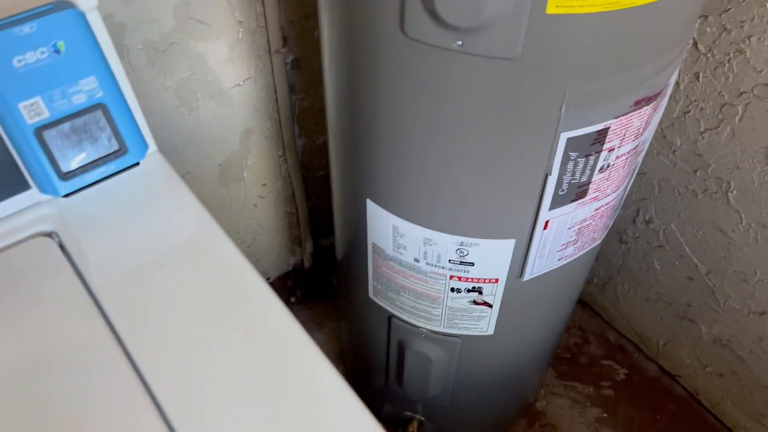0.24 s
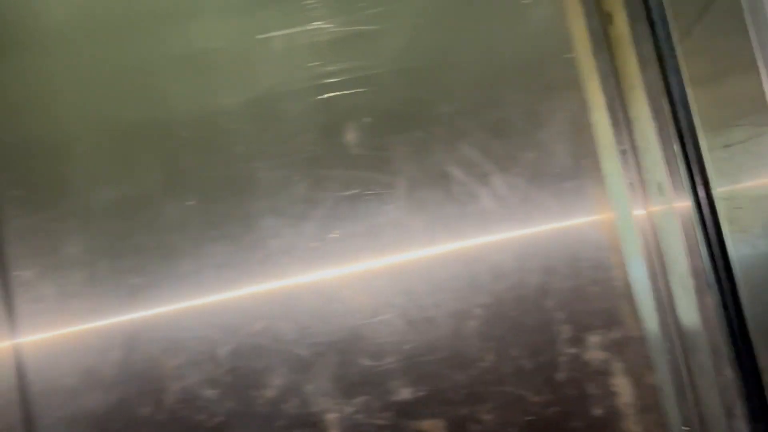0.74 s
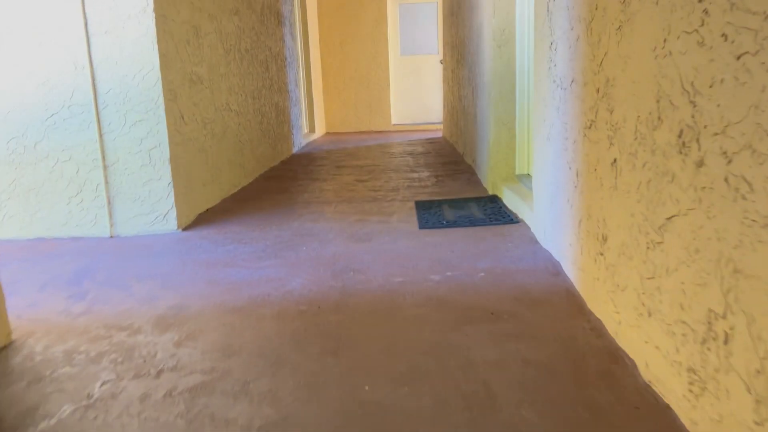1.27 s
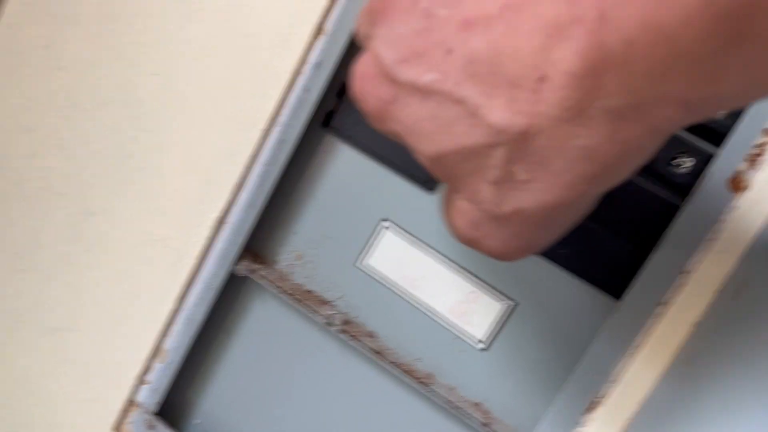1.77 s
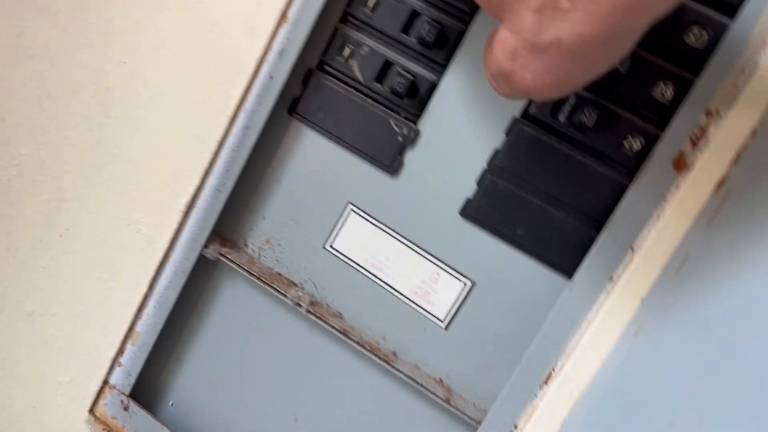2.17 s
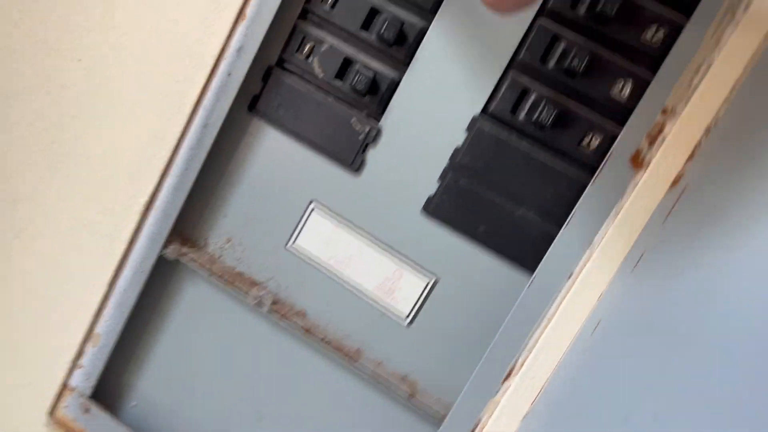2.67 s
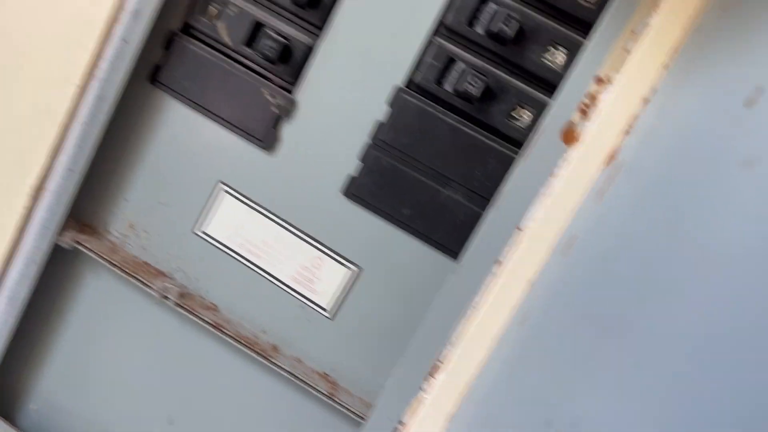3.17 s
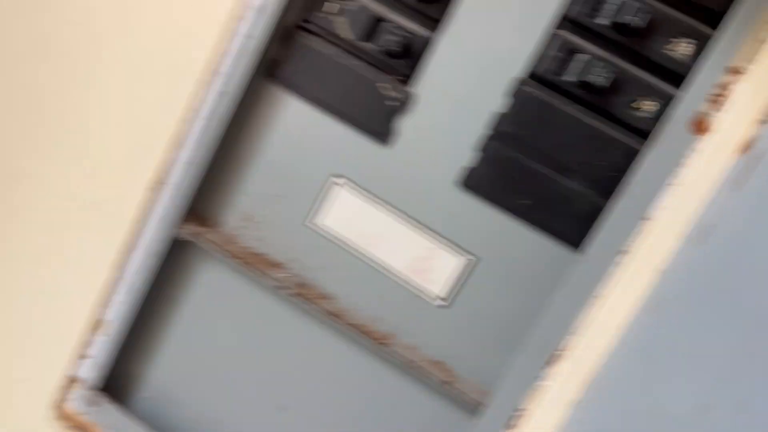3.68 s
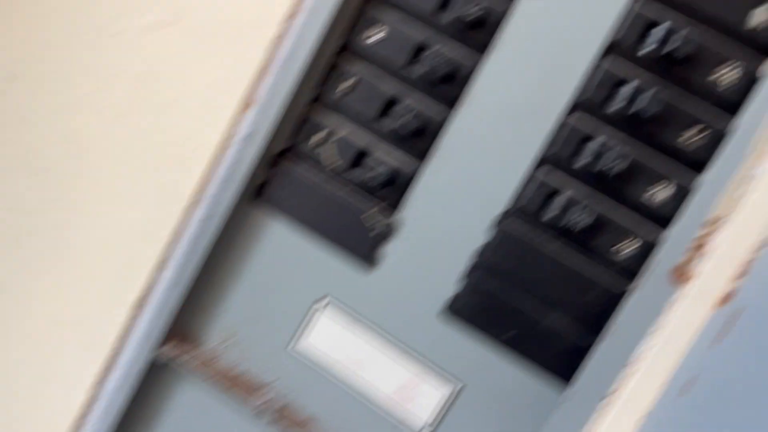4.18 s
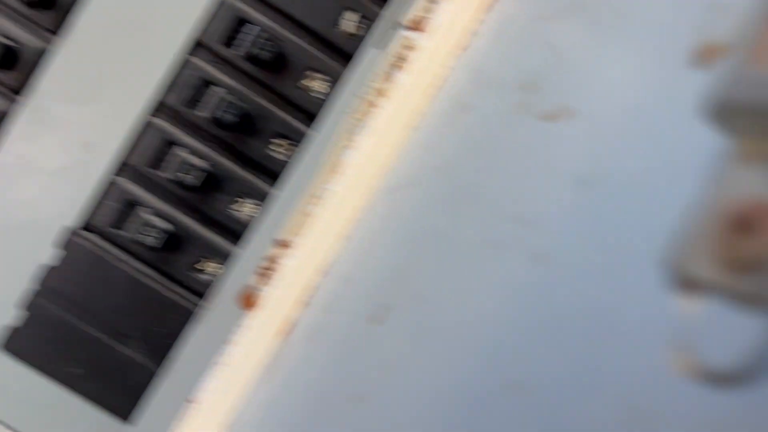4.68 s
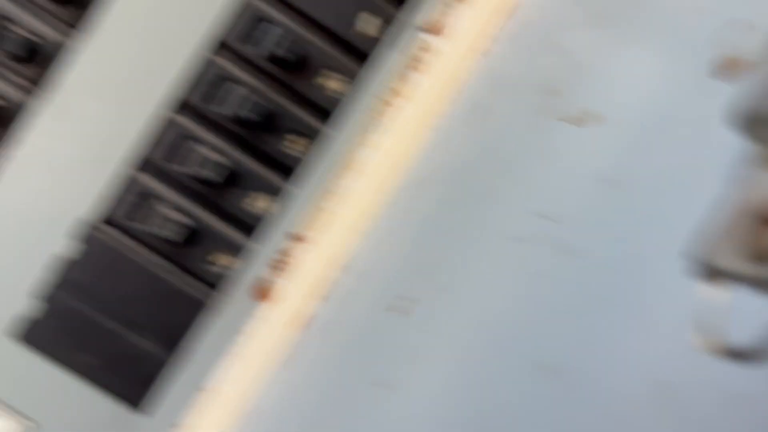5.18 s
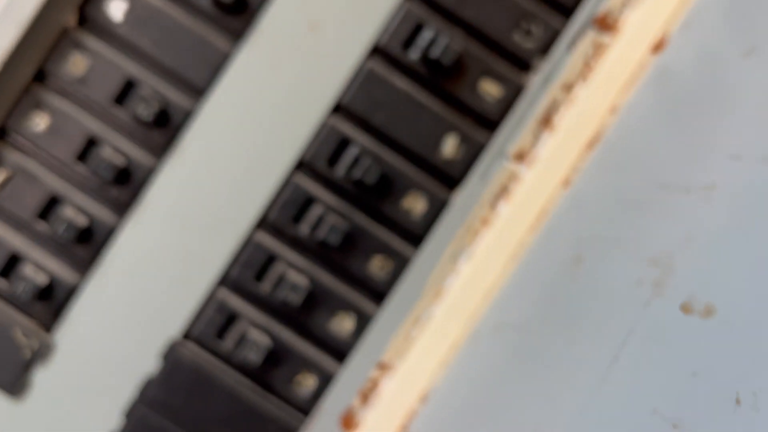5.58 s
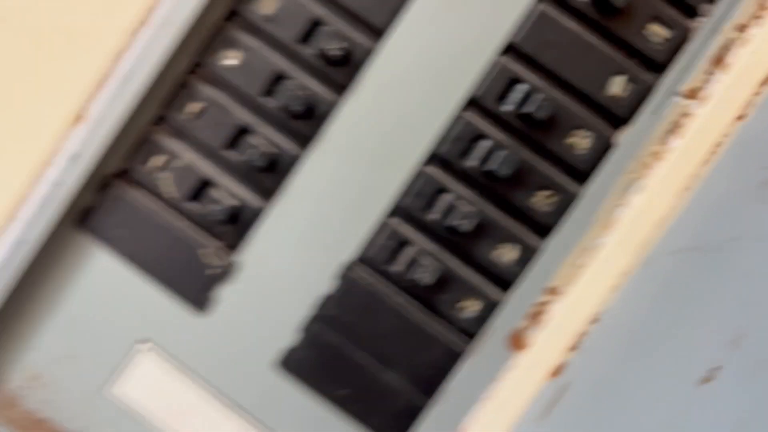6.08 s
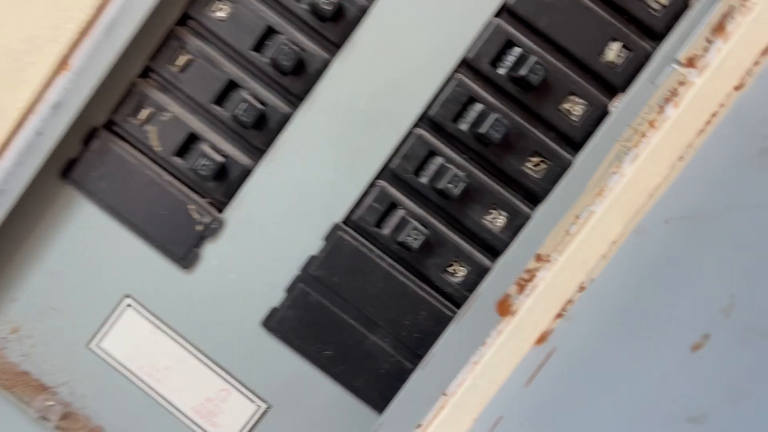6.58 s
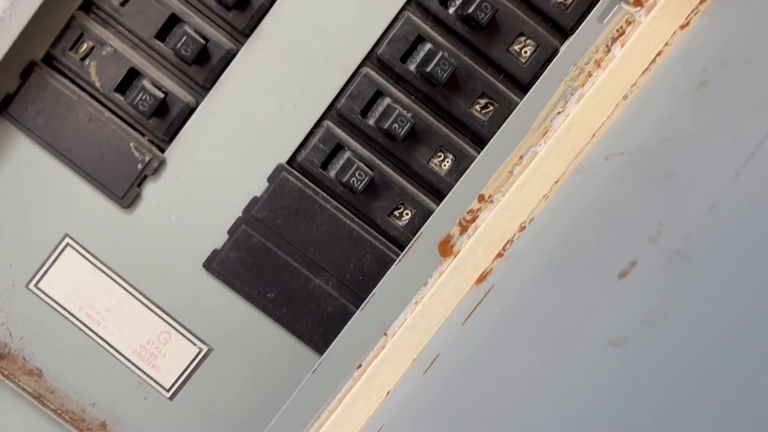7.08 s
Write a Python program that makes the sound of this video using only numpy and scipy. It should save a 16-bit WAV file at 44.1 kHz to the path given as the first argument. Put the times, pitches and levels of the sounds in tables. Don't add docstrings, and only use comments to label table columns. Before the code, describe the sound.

Quiet closet hum, a hollow lift door rumbling and squeaking, then old breakers snapping hard in a rattling steel panel in a ringing room.

```python
import sys
import numpy as np
from scipy import signal
from scipy.fft import rfft, irfft, next_fast_len
from scipy.io import wavfile
from scipy.ndimage import uniform_filter1d, map_coordinates

SR = 44100
rng = np.random.default_rng(int(sys.argv[2]) if len(sys.argv) > 2 else 0)


def field_ratio(decibels):
    return 10 ** (np.asarray(decibels, dtype=float) / 20)


def unload_audio(sound):
    columns = np.transpose(np.atleast_2d(sound))
    steps = np.round(np.clip(columns, -1, 1) * 32767)
    wavfile.write(sys.argv[1], SR, steps.astype(np.int16))


N = 323253
T = np.arange(N) / SR

# (t/s, ring t60/s, box knock level/dB, room level/dB, slow low wash level/dB)
THROWS = [
    (1.612, 0.42, -19, -25.5, -32),
    (2.372, 0.59, -16, -23.5, -35),
    (3.518, 0.89, -22.5, -23.5, -55),
    (3.788, 0.71, -32.5, -23, -54),
    (4.783, 0.3, -28, -33, -55),
    (4.985, 0.35, -20, -21, -42),
    (5.838, 0.48, -24.5, -23.5, -40.5),
    (6.522, 0.48, -18, -26.5, -34.5),
    (7.066, 0.63, -20, -24, -36.5),
]
# (f/Hz, level/dB per Hz)
SNAP = [(200, -21), (300, 13.5), (600, 4.5), (1300, 2), (2300, -8.5), (3500, -7), (5500, -11.5),
        (8000, -10), (11500, -20), (15500, -6.5), (17200, -81.5)]
# (f/Hz, level/dB per Hz)
TAIL = [(200, 7), (300, -3), (600, -0.5), (1300, 1.5), (2300, -3.5), (3500, -1), (5500, -0.5), (8000, 2),
        (11500, -1.5), (15500, -4), (17200, -95)]
# (f/Hz, width/Hz, level/dB)
PANEL = [(288.5, 8.7, 7.5), (526, 26, 8), (890, 55, -1.5), (1267, 19, 3.5), (1517, 110, -2), (2060, 28, 5),
         (2265, 34, 6), (2570, 170, 5.5), (2830, 52, 7.5), (3100, 70, 5), (3324, 74, -7.5), (3580, 260, 0),
         (3900, 90, -2.5), (4600, 590, -1), (5290, 210, 1), (5890, 55, 3)]


def unit(x):
    return x / np.sqrt(np.mean(x ** 2) + 1e-20)


def along(points, hz):
    f, v = np.transpose(points)
    return np.interp(np.log(hz + 1), np.log(f + 1), v)


def curves(rows):
    s, *cols = np.transpose(rows)
    return [np.interp(T, s, c) for c in cols]


def wobble(rate, size=N):
    return map_coordinates(rng.standard_normal(int(size * rate / SR) + 4), [T[:size] * rate])


def filtered(x, response):
    m = next_fast_len(N + 8192)
    return irfft(rfft(x, m) * response(np.fft.rfftfreq(m, 1 / SR)), m)[..., :N]


def band(hz, lo_hz, hi_hz):
    return 1 / np.sqrt((1 + (lo_hz / (hz + 1)) ** 6) * (1 + (hz / hi_hz) ** 6))


def peaks(modes, hz):
    return np.sqrt(sum(field_ratio(db) ** 2 / (1 + (2 * (hz - c) / w) ** 2) for c, w, db in modes))


def noise(spectrum, lo_hz, hi_hz, body=lambda hz: 1):
    colour = lambda hz: field_ratio(along(spectrum, hz)) * band(hz, lo_hz, hi_hz) * body(hz)
    return unit(filtered(rng.standard_normal((2, N)), colour))


def dying(times, db, t60, rise):
    power = np.zeros(N)
    for s, level in zip(times, db):
        start = round(s * SR)
        t = T[:min(round(t60 * SR), N - start)]
        power[start:][:len(t)] += (field_ratio(level - 60 * t / t60) * (1 - np.exp(-t / rise))) ** 2
    return np.sqrt(power)


def rings(rows, rise, blur):
    out = np.zeros((2, N))
    for s, hz, db, t60 in rows:
        start = round(s * SR)
        t = T[:min(round(t60 * SR), N - start)]
        drift = blur * np.array([wobble(44.7, size=len(t)), wobble(40, size=len(t))])
        tone = np.sin(2 * np.pi * (hz * t + rng.random((2, 1))) + drift)
        out[:, start:][:, :len(t)] += field_ratio(db - 60 * t / t60) * (1 - np.exp(-t / rise)) * tone
    return out


def breakers():
    # (t/s, peak/dB, spring f/Hz, rattle over peak/dB, treble/dB)
    snaps = [(1.612, -11.5, 2850, -4, 1.5), (1.636, -14.5, 2900, -8, -0.5), (2.3493, -12, 8350, -15, -3),
             (2.3664, -1, 5340, -22.5, 1), (2.3731, 0, 7660, -14.5, 0.5), (2.3848, -6, 2830, -20, -0.5),
             (3.5163, -3.5, 4940, -15.5, 1), (3.5217, -2, 3150, -14, 0), (3.5302, -6.5, 4180, -11, -3),
             (3.5385, -13, 3300, -19.5, -1), (3.7857, 0.5, 4600, -33, -2), (3.792, -0.5, 3430, -16.5, -1.5),
             (4.783, -6, 3100, -12.5, 1), (4.9811, -7.5, 3040, -11.5, -1), (4.987, 3, 3460, -17.5, 1),
             (4.9994, -5.5, 3320, -12, -9), (5.013, -1, 3100, -14, 1), (5.8356, 0.5, 5320, -17, 0.5),
             (5.843, 1.5, 3920, -16.5, 0.5), (6.5182, -8, 7730, -22, 3), (6.524, -0.5, 3660, -13.5, 1.5),
             (6.541, -10.5, 3050, -8, 1), (7.0589, -8.5, 7300, -11.5, 0), (7.0665, -3, 8150, -12.5, 0),
             (7.0737, -8, 3100, -11, -0.5)]
    # (t/s, peak/dB, spring f/Hz, rattle over peak/dB, treble/dB)
    ticks = [(2.1335, -47, 5330, 0, -8), (2.212, -31.5, 8200, -16, 4), (2.25, -14, 3510, -21, 4),
             (2.81, -48, 9000, -20, 6), (2.843, -51, 8000, -20, 6), (2.8843, -39.5, 2670, -5, -6),
             (2.988, -36.5, 2590, -17, 9.5), (3.042, -37, 4360, -13, 7), (3.064, -21, 6030, -20.5, -16),
             (3.1052, -26, 4720, -19, -5), (3.227, -34, 7460, -13, -12), (3.251, -45.5, 2570, 0, -5),
             (3.283, -37, 6000, -11, -5), (3.295, -10.5, 4360, -19, 0), (3.381, -23, 7500, -12, -4.5),
             (4.1885, -35.5, 7500, -44, 5), (4.4556, -44, 4860, -24, -1), (4.695, -42.5, 3540, -5, 6),
             (4.924, -23.5, 3160, -10.5, 3), (5.402, -41, 5000, -23, -2), (5.5835, -7, 5500, -17, -2),
             (6.217, -34.5, 8000, -14, 3), (6.262, -35.5, 2770, -12, -12), (6.2931, -36.5, 3720, -11, 5),
             (6.4242, -7.5, 7570, -21.5, 1), (6.967, -43, 5890, -37, 6), (6.9878, -5, 4120, -17.5, 0)]
    tick_knock_db, tick_room_db = -23.5, -30.5
    blows = [(at, knock_db, room_db) for at, _, knock_db, room_db, _ in THROWS]
    blows += [(at, db + tick_knock_db, db + tick_room_db) for at, db, *_ in ticks]
    blow_s, knock_db, room_db = np.transpose(blows)
    return contacts(snaps + ticks) + box(blow_s, knock_db) + 2 * steel() + room(blow_s, room_db)


def sheet(hz):
    return 0.69 + peaks(PANEL, hz)


def contacts(rows):
    s, peak, spring_hz, rattle_db, treble_db = np.transpose(rows)
    treble_hz = 8500
    creep = dying(N / SR - s, peak - 30, 0.039, rise=0.00041)[::-1] * noise(SNAP, 1800, 5800)
    crack = dying(s, peak - 8, 0.018, rise=0.00056) * noise(TAIL, 2400, treble_hz)
    bright = dying(s, peak + treble_db - 10, 0.014, rise=0.0004) * noise(TAIL, treble_hz, 19000)
    fizz = dying(s, peak + rattle_db + treble_db - 12, 0.12, rise=0.002) * noise(SNAP, treble_hz, 16500)
    spring = rings(zip(s, spring_hz, peak - 11, 0 * s + .02), rise=.0005, blur=0)
    grains = field_ratio(2.0 * wobble(350))
    rattle = dying(s, peak + rattle_db, 0.13, rise=0.0033) * grains * noise(SNAP, 1470, treble_hz, sheet)
    return creep + crack + bright + fizz + spring + rattle


def box(blow_s, knock_db):
    rough = field_ratio(1.7 * wobble(120))
    return dying(blow_s, knock_db, 0.19, rise=0.014) * rough * noise(SNAP, 280, 1700, sheet)


def steel():
    # (f/Hz, level/dB)
    ringing = [
        [(380, -33), (536, -44), (969, -37), (1440, -39), (2000, -45), (2880, -42), (5200, -45)],
        [(519, -33), (1222, -36.5), (2457, -37), (2872, -38.5), (3042, -41), (5076, -38.5)],
        [(511, -44.5), (624, -47), (1305, -45), (1881, -44), (3292, -41), (5410, -48.5)],
        [(468, -44.5), (646, -44), (1367, -47), (1960, -37.5), (2650, -44), (3380, -42), (3612, -41),
         (5768, -41.5)],
        [(950, -45), (2745, -41), (3033, -41), (3394, -53.5)],
        [(880, -33), (1139, -39.5), (2310, -40), (3400, -35), (3680, -39)],
        [(468, -42), (945, -38.5), (1087, -35.5), (2250, -36.5), (3540, -40), (3671, -39)],
        [(291, -32.5), (1165, -37), (1464, -40), (2651, -41), (3187, -35), (4282, -42)],
        [(290, -35.5), (519, -53), (1453, -41.5), (3378, -40), (5125, -49)],
    ]
    # (t/s, f/Hz, level/dB, t60/s)
    pings = [(1.82, 796, -39, 0.069), (1.82, 1410, -39, 0.11), (2.249, 1437, -34, 0.052),
             (2.379, 330, -27, 0.16), (2.38, 1300, -24, 0.13), (3.5155, 4900, -19, 0.037),
             (3.536, 3600, -16.5, 0.038), (3.795, 640, -34.5, 0.1), (3.801, 468, -31, 0.2),
             (3.795, 2004, -27, 0.15), (3.788, 4300, -21.5, 0.079), (2.4, 518, -36.5, 0.29),
             (4.784, 956, -30, 0.075), (4.784, 1165, -28, 0.092), (4.925, 3300, -38, .06),
             (4.784, 3050, -27, 0.055), (4.988, 3260, -11.5, 0.072), (4.987, 1193, -19.5, 0.1),
             (5.586, 1240, -41.5, 0.14), (5.586, 910, -47, 0.23), (5.585, 2200, -37, 0.15),
             (5.585, 4000, -32, 0.066), (6.43, 292, -35, 0.23), (4.99, 3560, -16, .09),
             (5.012, 2950, -17.5, 0.083), (2.385, 2800, -21.5, .1), (2.39, 430, -24, .12),
             (3.296, 1330, -32.5, 0.062), (5.584, 5200, -40, 0.099), (5.84, 3633, -21, .15),
             (5.84, 2070, -35.5, .1), (6.426, 2810, -35, 0.056), (6.426, 3750, -37, 0.075),
             (6.426, 4334, -32, 0.079), (6.989, 296, -33.5, 0.091), (6.989, 3800, -31.5, .11),
             (7.07, 3180, -26.5, 0.24)]
    rows = [(at, *mode, t60) for (at, t60, *_), modes in zip(THROWS, ringing) for mode in modes]
    return rings(rows + pings, rise=.004, blur=.55)


def room(times, db):
    # (f/Hz, t60/s)
    decay = [(200, 0.46), (600, 0.62), (1400, 0.72), (3700, 0.75), (9700, 0.57), (15000, 0.5)]
    # (f/Hz, width/Hz, level/dB)
    kept = [
        [(388, 49, 0), (2900, 68, 5), (5050, 170, -3), (5900, 50, -13)],
        [(1230, 41, -2.5), (2430, 38, -0.5), (4940, 40, -2), (5980, 60, -1)],
        [(1610, 100, -4), (3290, 64, 1), (4450, 50, -6), (5070, 96, -7)],
        [(495, 51, -0.5), (1350, 78, -14), (1960, 61, 1), (3620, 82, -3.5)],
        [(1130, 33, 1), (2770, 93, 0), (5770, 67, -4)],
        [(1130, 160, -3), (2320, 45, -0.5), (3340, 580, -0.5), (5580, 50, -4)],
        [(1090, 37, 0), (2270, 110, 0.5), (3620, 150, -0.5), (6090, 46, 1)],
        [(1170, 48, -1), (2640, 32, -3), (3270, 40, 4.5), (5230, 39, -5)],
        [(1150, 77, -3), (2920, 29, 3), (3360, 49, 2), (6210, 38, -3)],
    ]
    kept_db, sheet_share, delay_s = 7, 0.63, .014
    tail = noise(TAIL, 110, 11400, lambda hz: 1 + sheet_share * peaks(PANEL, hz))
    hz, t, z = signal.stft(tail, SR, nperseg=512)
    power = np.zeros(z.shape[1:])
    lumps = 1.2 * rng.standard_normal((len(times), len(hz) // 2 + 1, 1))
    lumps = lumps.repeat(2, axis=1)[:, :len(hz)]
    gains = field_ratio(db[:, None, None] + lumps)
    for throw, modes in enumerate(kept):
        gains[throw] *= np.hypot(1, field_ratio(kept_db) * peaks(modes, hz))[:, None]
    for s, gain in zip(times, gains):
        late = (t >= s + delay_s) & (t < s + 1)
        fall_db = -60 * (t[late] - s - delay_s) / along(decay, hz)[:, None]
        power[:, late] += (gain * field_ratio(fall_db)) ** 2
    return signal.istft(z * np.sqrt(power), SR, nperseg=512)[1][:, :N]


def door():
    # (t/s, weight on the track/dB, friction/dB)
    travel = [(.5, -27, -17), (.512, -33, -34.5), (.53, -31.5, -26), (.6, -23.5, -37), (.68, -21.5, -49),
              (.716, -20.5, -45.5), (.85, -24, -46), (.897, -21, -45.5), (.907, -25, -33),
              (.94, -13, -29.5), (.972, -12.5, -33.5), (.98, -18.5, -24.5), (1.05, -14, -27),
              (1.082, -12.5, -31.5), (1.105, -11.5, -31), (1.15, -17, -33.5), (1.185, -23, -35.5),
              (1.2, -23, -46)]
    # (f/Hz, level/dB per Hz)
    door_air = [(30, 6), (60, -9), (120, -23), (200, -16), (300, -12.5), (600, -17), (1300, -27),
                (2300, -26), (3500, -26), (5500, -30), (8000, -31.5), (11500, -31.5), (15500, -30),
                (17200, -90)]
    # (f/Hz, width/Hz, level/dB)
    leaf_modes = [(39, 27, 3), (75.3, 10, 6.5), (131, 8.7, 3), (181, 11.3, -3.5), (330, 260, -18),
                  (1310, 440, -15), (5800, 400, -32), (7150, 470, -33.5), (8200, 410, -36)]
    weight_db, friction_db = curves(travel)
    boom = field_ratio(weight_db)
    roll = field_ratio(8.5 + 0.34 * weight_db + 0.79 * friction_db)
    rub = field_ratio(friction_db)
    scrape = field_ratio(friction_db - 1.5)
    jolts = wobble(45.0)
    body = lambda hz: .5 + peaks(leaf_modes, hz) / field_ratio(along(door_air, hz))
    leaf = lambda lo_hz, hi_hz: noise(door_air, lo_hz, hi_hz, body)
    rolling = boom * field_ratio(2 * jolts) * leaf(21, 127) + roll * field_ratio(0.54 * jolts) * leaf(171, 677)
    grit = field_ratio(1.5 * jolts + 0.37 * wobble(200))
    return rolling + grit * (rub * leaf(1000, 4200) + scrape * leaf(4500, 15400))


def hall():
    # (t/s, level/dB)
    travel = [
        (1.2, -50),
        (1.22, -47),
        (1.26, -39),
        (1.334, -42.5),
        (1.378, -39.5),
        (1.388, -33),
        (1.432, -35.5),
        (1.445, -39),
        (1.6, -40.5),
    ]
    # (f/Hz, level/dB per Hz)
    hall_air = [(30, -17), (60, 2.5), (120, -12.5), (200, -9.5), (300, -16), (600, -20.5), (1300, -15.5),
                (2300, -20.5), (3500, -23), (5500, -24), (8000, -26), (11500, -32), (15500, -30),
                (17200, -90)]
    friction_db, = curves(travel)
    boom = field_ratio(-21 + 0.21 * friction_db) * field_ratio(2.8 * wobble(39.73))
    scrape = field_ratio(friction_db) * field_ratio(1.9 * wobble(59.35) + 0.83 * wobble(400))
    return boom * noise(hall_air, 22, 534) + scrape * noise(hall_air, 470, 16000)


def rubs():
    # (t/s, half length/s, f/Hz, level/dB)
    squeaks = [(.515, .012, 5800, -38), (0.545, 0.035, 5650, -41), (.88, 0.029, 7260, -53),
               (.93, .014, 5560, -44), (.927, 0.0054, 11200, -51), (1.0, .02, 5700, -33.5),
               (1.13, 0.038, 5560, -45), (1.14, 0.026, 11300, -48), (1.363, .015, 5570, -39),
               (1.4, 0.012, 5570, -37.5), (1.4, 0.031, 11300, -57), (1.51, 0.027, 11300, -53),
               (1.582, 0.012, 5560, -42), (1.58, 0.013, 11200, -54)]
    # (t/s, half length/s, f/Hz, level/dB)
    groans = [
        (.54, 0.036, 299, -23.5),
        (.57, 0.053, 198, -27),
        (.945, 0.023, 77, -13),
        (1.0, 0.016, 396, -26),
        (1.05, 0.02, 70.4, -10.5),
        (1.07, 0.036, 232, -21.5),
        (1.14, 0.035, 230.4, -20),
    ]
    # (t/s, half length/s, f/Hz, level/dB)
    scuffs = [(.535, 0.035, 1350, -32), (.54, 0.021, 1720, -37), (.59, 0.019, 1235, -35),
              (.914, 0.009, 2000, -30), (.915, 0.01, 1186, -29.5), (.955, .018, 1450, -31),
              (.99, .012, 1535, -29), (1.08, 0.037, 1003, -31), (1.16, .025, 1000, -33.5),
              (1.395, 0.019, 1576, -35), (1.43, .015, 1286, -38), (1.475, 0.029, 1360, -43),
              (6.302, .015, 2270, -51)]
    # (t/s, half length/s, f/Hz, level/dB)
    broad = [(1.27, .025, 1490, -38.5), (2.31, 0.031, 943, -36), (2.32, 0.033, 453, -41),
             (3.312, 0.026, 537, -41.5), (3.33, 0.047, 231, -43), (4.371, .015, 1197, -50),
             (4.631, 0.034, 998, -51), (4.735, 0.045, 3590, -52.5), (4.736, 0.042, 7560, -51.5),
             (5.67, .05, 1054, -45), (5.685, 0.0137, 338, -34.5), (5.87, .032, 388.4, -33),
             (4.8, 0.012, 990, -47), (6.262, 0.0072, 763, -40.5), (6.263, 0.0046, 2700, -45),
             (6.315, .03, 516, -44.5), (6.775, 0.013, 953, -41), (6.79, .03, 217, -37.5)]
    kinds = [(squeaks, 35, 3.5), (groans, 9.3, 3.5), (scuffs, 5, 0), (broad, 1.3, 0)]
    out = np.zeros((2, N + 2 * SR))
    for strokes, q, steady in kinds:
        for s, half, hz, db in strokes:
            t = np.arange(-round(3 * half * SR), round(3 * half * SR)) / SR
            turn = 2 * np.pi * hz * t
            flutter = lambda: wobble(hz / q, size=len(t))
            pair = np.array([(steady + flutter()) * np.sin(turn) + flutter() * np.cos(turn) for _ in "LR"])
            pair = pair / np.hypot(1, steady / 2)
            start = SR + round((s + t[0]) * SR)
            out[:, start:][:, :len(t)] += field_ratio(db) * np.exp(-(t / half) ** 2) * pair
    return out[:, SR:SR + N]


def thuds():
    # (t/s, peak/dB, f/Hz, overtone level/dB, t60/s)
    blows = [
        (5.639, -17.5, 144, -23, 0.56),
        (5.674, -17.5, 147.8, -16.5, 0.45),
        (6.199, -24.5, 148, -6.5, 0.26),
        (6.299, -33, 133, -2.5, 0.32),
        (6.537, -17.5, 113.5, -7, 0.37),
        (6.776, -28.5, 123.6, -8, 0.44),
        (7.08, -19.5, 121, -5.5, 0.27),
        (7.289, -26.5, 131, -24, 0.5),
    ]
    # (t/s, f/Hz, level/dB, t60/s)
    booms = [
        (6.545, 151, -27, .2),
        (6.774, 114, -27, .9),
        (7.24, 124, -34, .3),
    ]
    rows = []
    for s, db, hz, over_db, t60 in blows:
        rows += [(s, hz * 0.95, db - 11.0, t60), (s, hz * 1.15, db - 7.0, t60), (s, 292, db + over_db, t60)]
    return rings(rows + booms, rise=0.0041, blur=0.68)


def closet():
    # (f/Hz, width/Hz, level/dB)
    fridge = [(59.3, 7, 0), (148, 5.7, -3.5)]
    # (f/Hz, level/dB per Hz)
    closet_air = [(30, -22), (60, -3), (120, -19), (200, -12), (300, -14), (600, -19), (1300, -21),
                  (2300, -27.5), (3500, -28.5), (5500, -35), (8000, -33), (11500, -46.5), (15500, -67),
                  (17200, -90)]
    # (t/s, f/Hz, level/dB, t60/s)
    whine = (0, 1415, -43, .7)
    beat_s, beat_top_s = .044, .01
    hum = field_ratio(-44) * noise([(60, 0)], 41, 230, lambda hz: peaks(fridge, hz))
    hiss = field_ratio(-50 - 7.5 * T) * noise(closet_air, 230, 16500)
    beat = np.cos(np.pi * (T - beat_top_s) / beat_s)
    return hum + hiss + beat * rings([whine], rise=0.002, blur=0.34)


def air():
    # (f/Hz, width/Hz, level/dB)
    plant_modes = [(55.8, 2.4, 8.5), (118, 11, -2), (153, 21, -12.5)]
    # (f/Hz, level/dB per Hz)
    panel_air = [(30, -23), (60, -4.5), (120, -5), (200, -16), (300, -11.5), (600, -19.5), (1300, -23),
                 (2300, -27), (3500, -34), (5500, -35), (8000, -40.5), (11500, -48), (15500, -43),
                 (17200, -102)]
    pump_on_s, pump_off_s = 1.92, 2.7
    pump = np.clip(np.minimum(T - pump_on_s, pump_off_s - T) / .06, 0, 1)
    rumble, hum = field_ratio(-49 + 7.5 * pump), field_ratio(-44.5 - 2 * pump)
    plant = lambda lo_hz, hi_hz: noise([(60, 0)], lo_hz, hi_hz, lambda hz: peaks(plant_modes, hz))
    s, *_, wash_db = np.transpose(THROWS)
    hiss = np.hypot(field_ratio(-56), dying(s, wash_db, 0.89, rise=0.0078))
    drift = field_ratio(.7 * wobble(6))
    machinery = rumble * plant(38, 82.4) + hum * plant(93, 146)
    return machinery + hiss * drift * field_ratio(3.5) * noise(panel_air, 170, 16500)


def ports(pair, alike, lean, lag):
    turn = lambda hz: np.arccos(np.clip(along(alike, hz), -1, 1)) / 2
    mix = lambda hz: np.array([np.cos(turn(hz)), np.sin(turn(hz))]) * np.sqrt(2)
    mid, side = filtered(pair, mix)
    half = lambda hz: field_ratio(along(lean, hz) / 2) * np.exp(-.5j * lag(hz))
    tilt = lambda hz: np.array([half(hz), 1 / half(hz)])
    return filtered(np.array([mid + side, mid - side]), tilt) / np.sqrt(2)


def cut(count):
    # (start t/s, end t/s)
    shots = [
        (0, .497),
        (.503, 1.2),
        (1.205, 1.6),
        (1.602, 7.4),
    ]
    start, end = shots[count]
    return np.clip(np.minimum(T - start + (start == 0), end - T) / 0.02, 0, 1)


def scene():
    # (f/Hz, likeness)
    alike = [(60, 0.97), (300, 0.88), (700, 0.13), (2000, 0.033), (5500, 0.083), (7500, 0.08), (9000, 1),
             (16000, 0.69)]
    # (f/Hz, likeness)
    door_alike = [(100, .999), (400, 0.98), (1500, 0.46), (3500, 0.33), (5000, 0.14), (6300, 0.96),
                  (9000, 0.76), (12000, 1), (12500, 0.97)]
    # (f/Hz, left over right/dB)
    lean = [(300, 2), (1500, 1), (2500, 3), (4000, 0), (5500, -5.5), (7000, 0)]
    rub = rubs()
    panel = air() + thuds() + rub + breakers()
    still = cut(count=0) * closet() + cut(count=2) * (hall() + rub) + cut(count=3) * panel
    lag = lambda hz: -2 * np.pi * np.maximum(hz - 7150, 0) / 4780
    door_lag = lambda hz: np.pi * np.where(hz > 12300, 1, np.clip((hz - 6600) / 8000, 0, 1))
    upright = ports(still, alike, lean, lag)
    turned = ports(door() + rub, door_alike, [(60, 0)], door_lag)
    return upright + cut(count=1) * turned


def gated(x, holes, blow_db, patch_db):
    hz, _, z = signal.stft(x, SR, nperseg=1024)
    power = uniform_filter1d(np.abs(z) ** 2, size=8, axis=0)
    calm = power[hz > 13700].mean(0) < field_ratio(blow_db) ** 2
    near = uniform_filter1d(power, size=7, axis=1)
    faint = (power < near * field_ratio(patch_db) ** 2) & (hz[:, None] > 12300)
    empty = sum((hz > lo) & (hz < hi) for lo, hi in holes) > 0
    dropped = (faint | empty[:, None]) & calm
    return signal.istft(z * ~dropped, SR, nperseg=1024)[1][:N]


def top_cut(x):
    return signal.sosfilt(signal.butter(12, 17170, fs=SR, output="sos"), x)


def record(dry):
    x = filtered(dry, lambda hz: band(hz, 32, 17000))
    limited = x / (1 + np.abs(x) ** 6) ** (1 / 6)
    left, right = filtered(limited, lambda hz: hz < 17200)
    top = (15800, SR)
    mid = gated((left + right) / 2, [(13700, 15300), top], blow_db=-67, patch_db=-.8)
    side = gated((left - right) / 2, [top], blow_db=-62, patch_db=-1)
    return top_cut(np.array([mid + side, mid - side]))


dry = scene()
out = record(dry)
unload_audio(out)
```